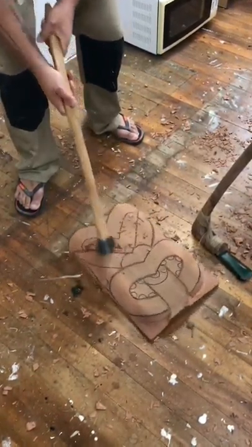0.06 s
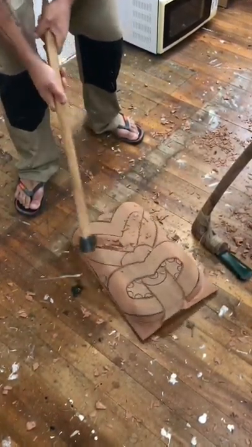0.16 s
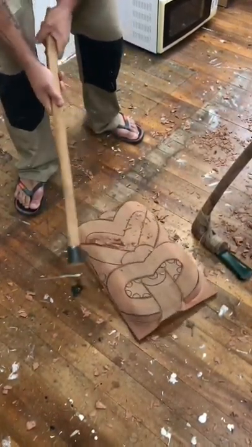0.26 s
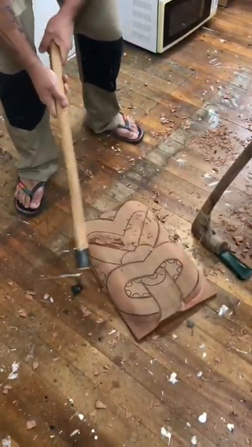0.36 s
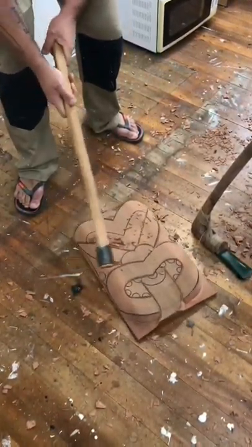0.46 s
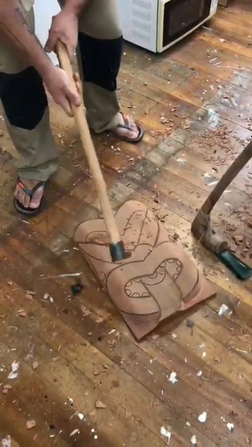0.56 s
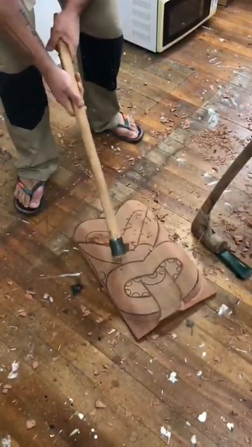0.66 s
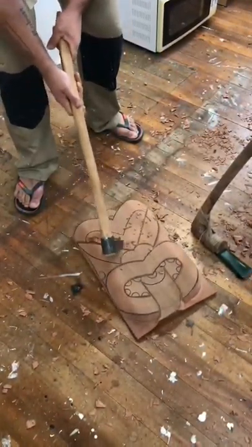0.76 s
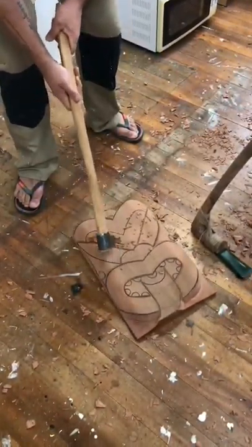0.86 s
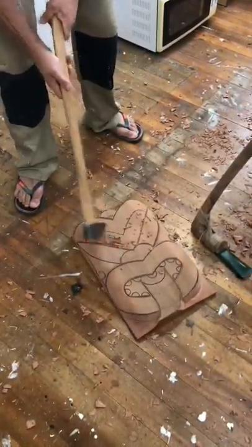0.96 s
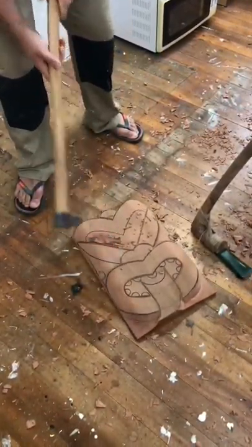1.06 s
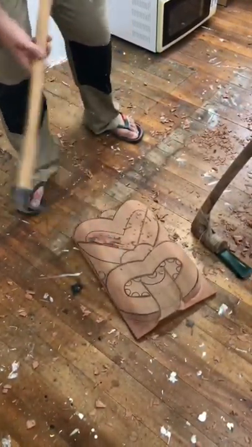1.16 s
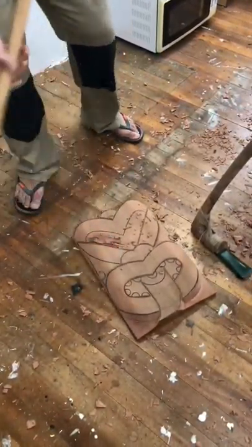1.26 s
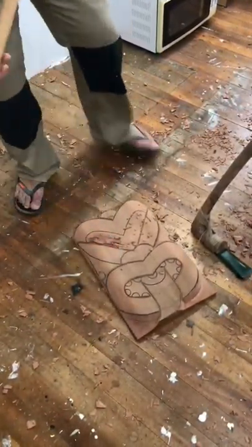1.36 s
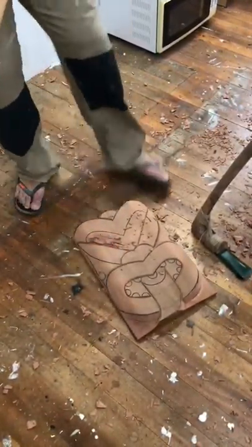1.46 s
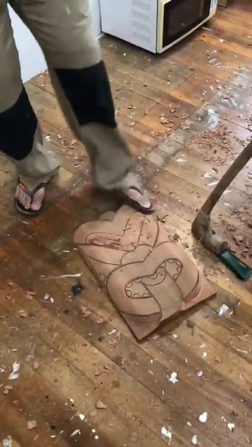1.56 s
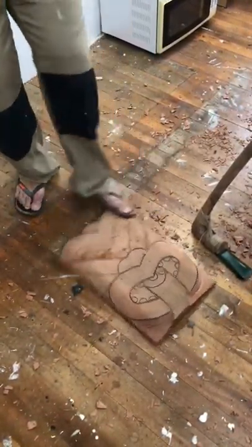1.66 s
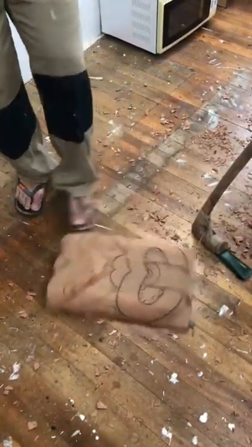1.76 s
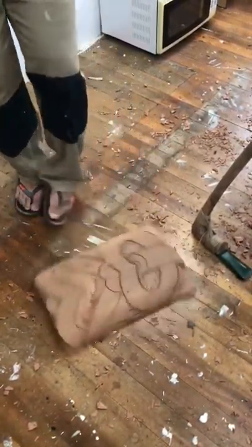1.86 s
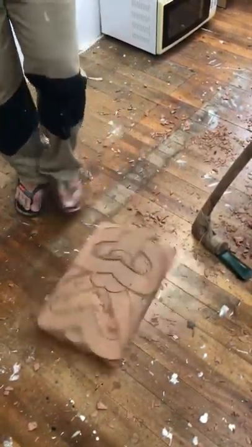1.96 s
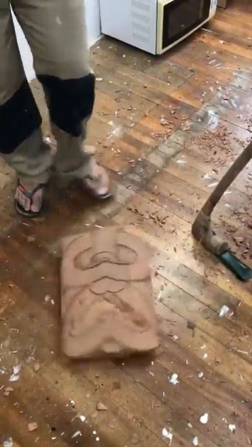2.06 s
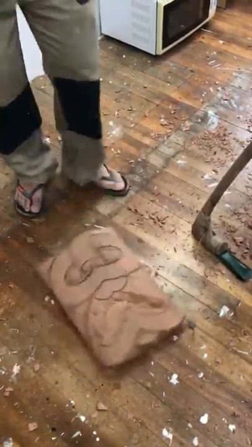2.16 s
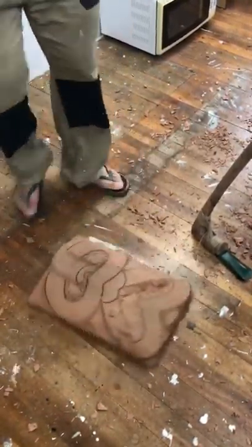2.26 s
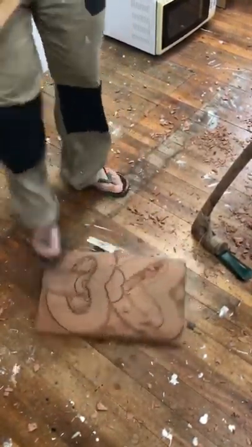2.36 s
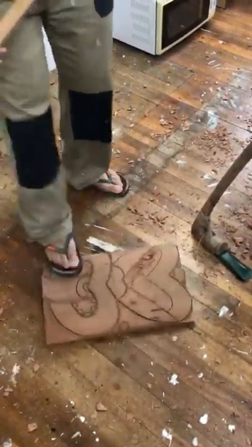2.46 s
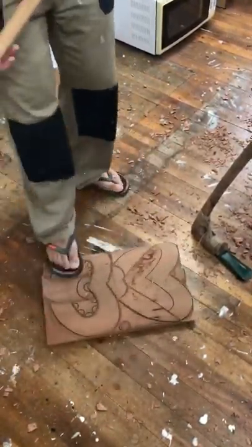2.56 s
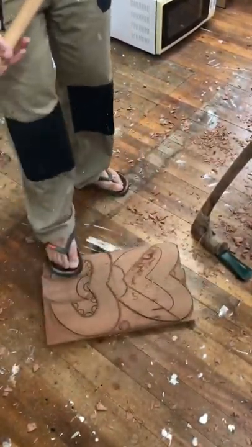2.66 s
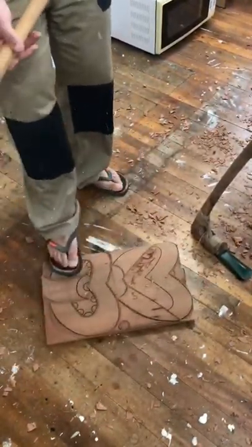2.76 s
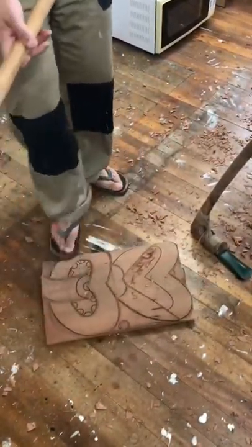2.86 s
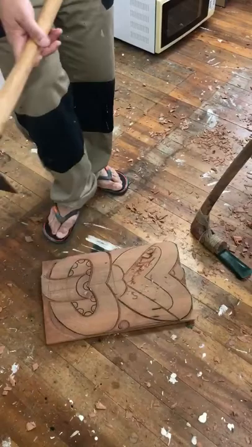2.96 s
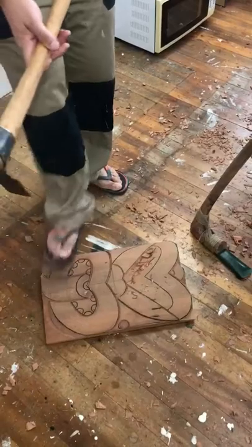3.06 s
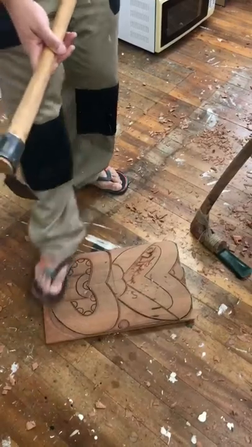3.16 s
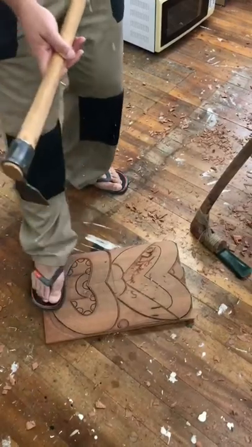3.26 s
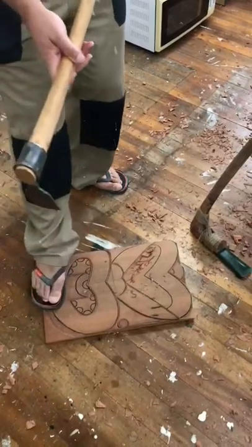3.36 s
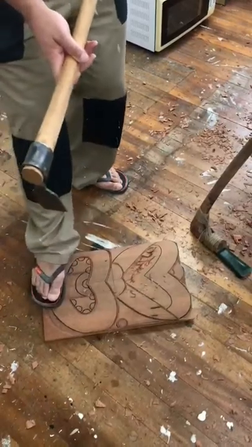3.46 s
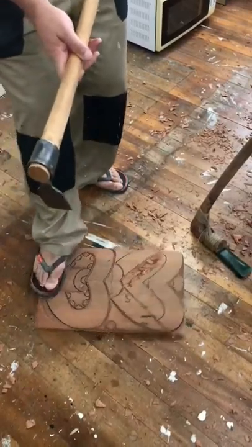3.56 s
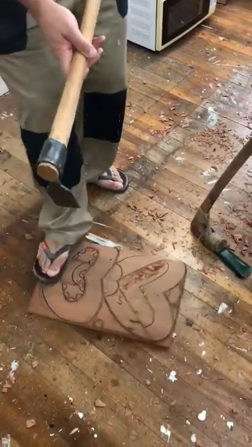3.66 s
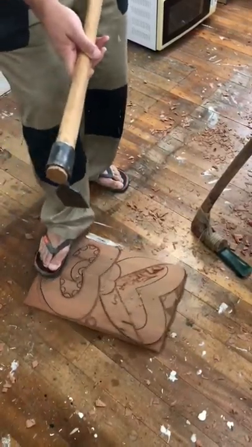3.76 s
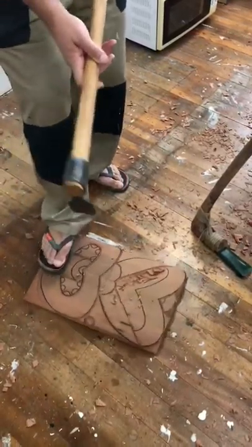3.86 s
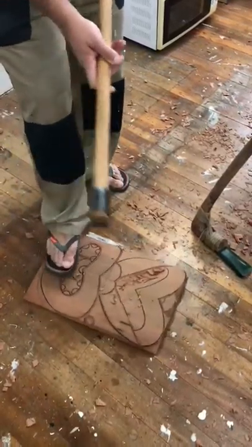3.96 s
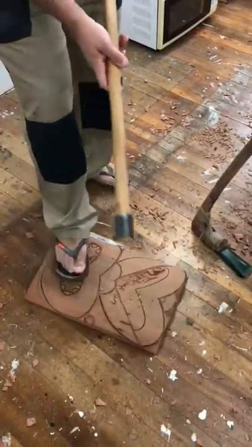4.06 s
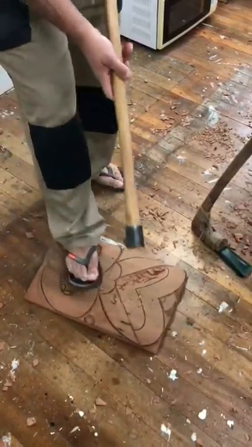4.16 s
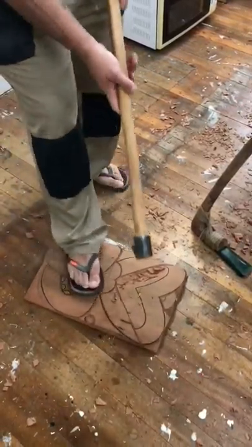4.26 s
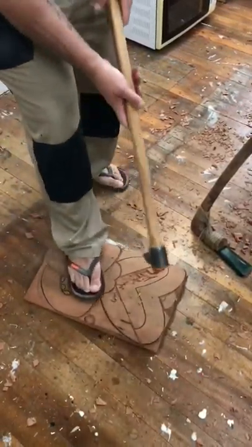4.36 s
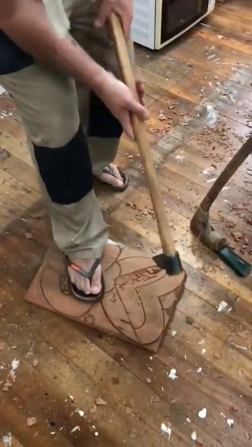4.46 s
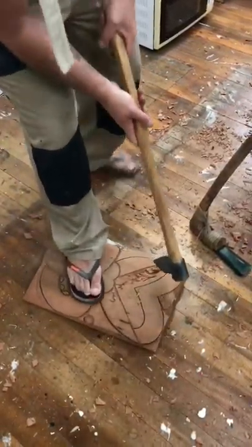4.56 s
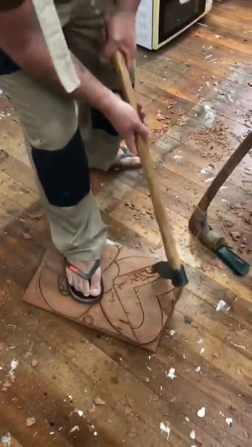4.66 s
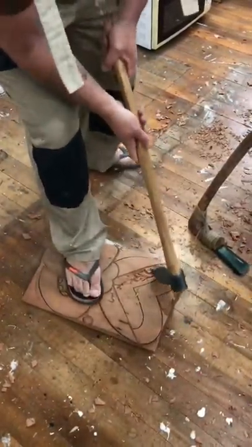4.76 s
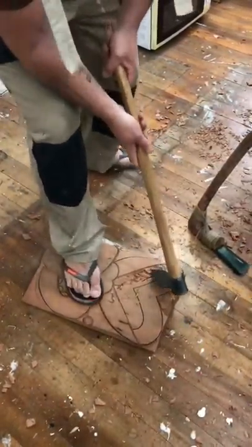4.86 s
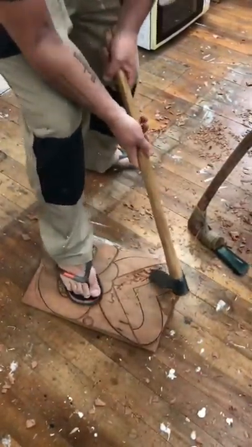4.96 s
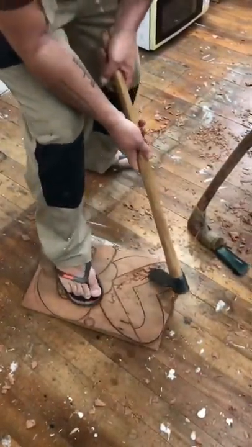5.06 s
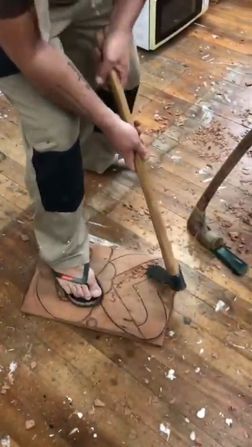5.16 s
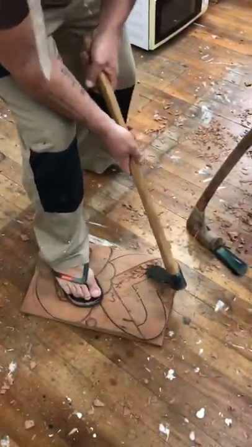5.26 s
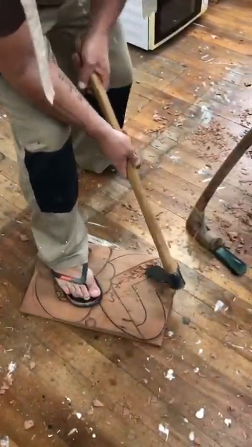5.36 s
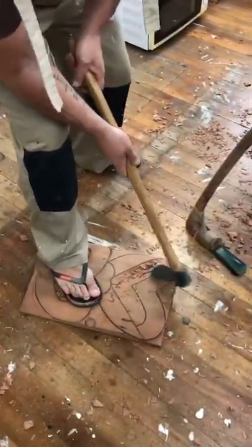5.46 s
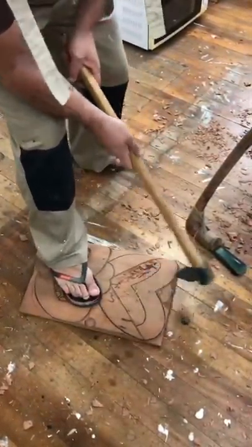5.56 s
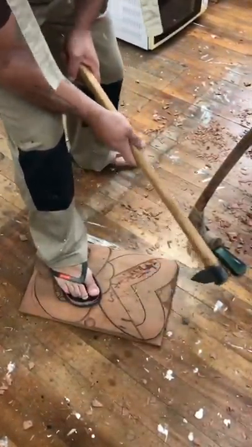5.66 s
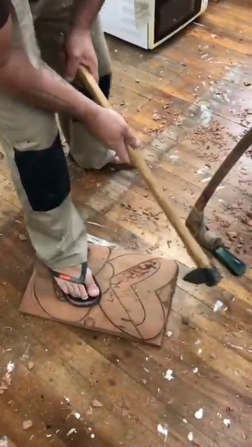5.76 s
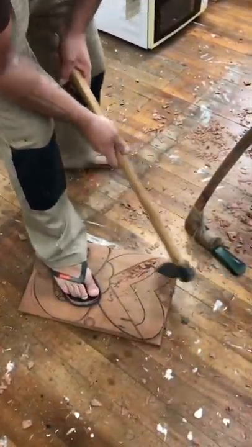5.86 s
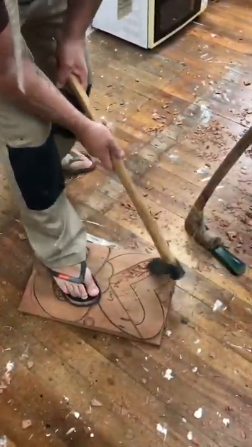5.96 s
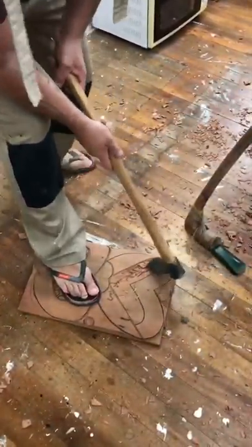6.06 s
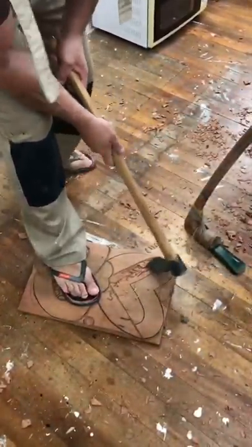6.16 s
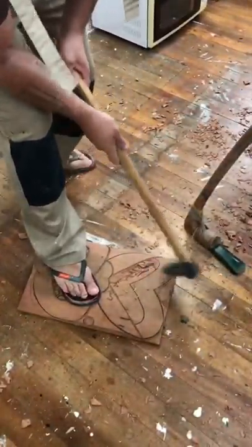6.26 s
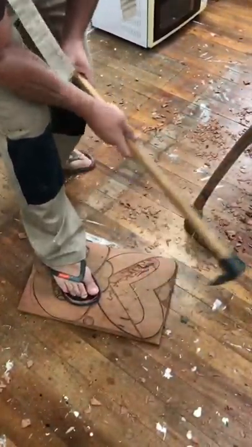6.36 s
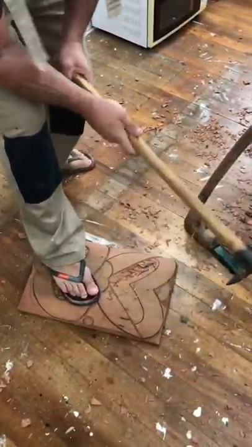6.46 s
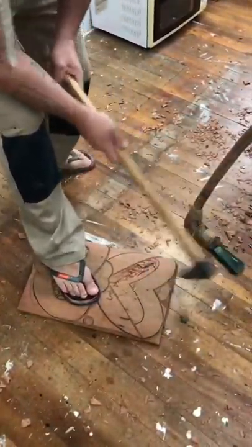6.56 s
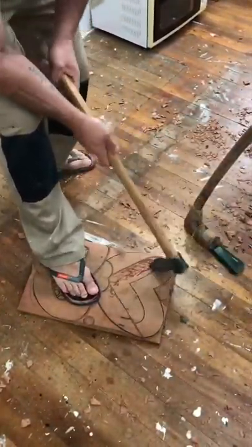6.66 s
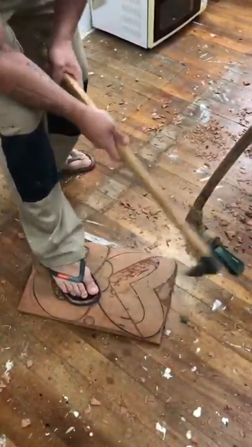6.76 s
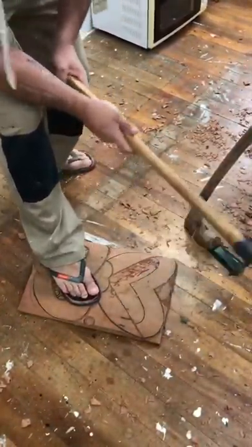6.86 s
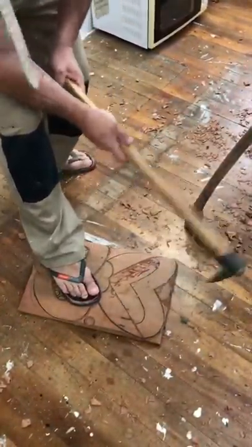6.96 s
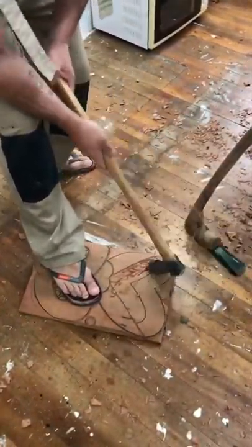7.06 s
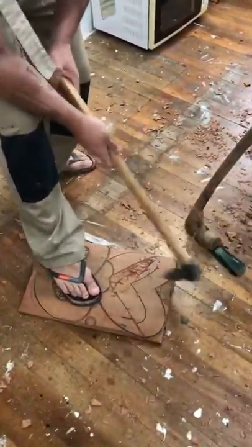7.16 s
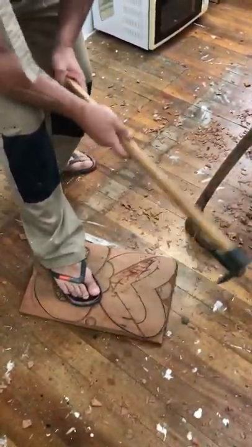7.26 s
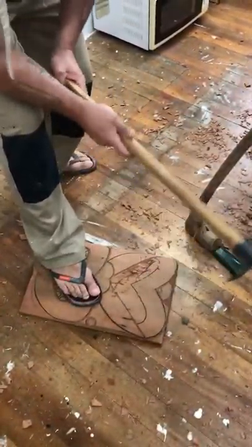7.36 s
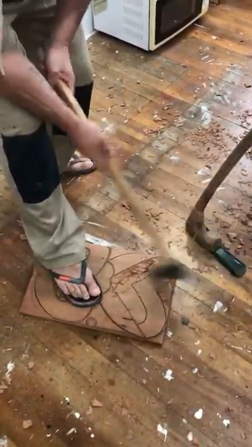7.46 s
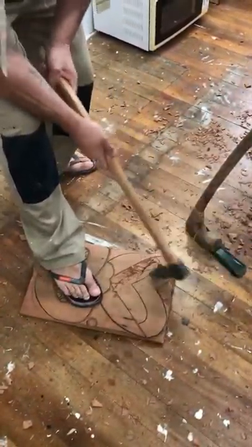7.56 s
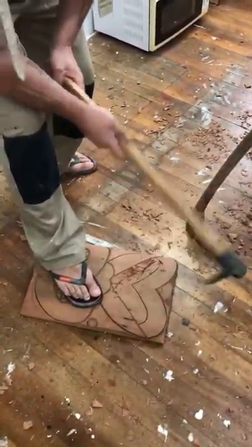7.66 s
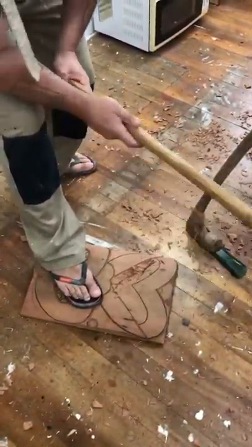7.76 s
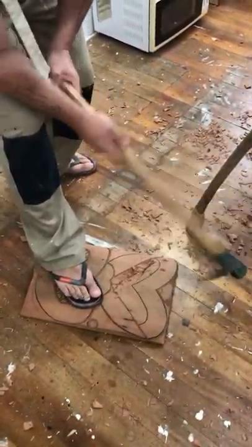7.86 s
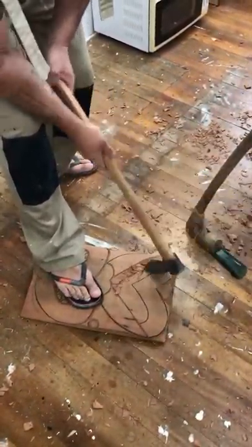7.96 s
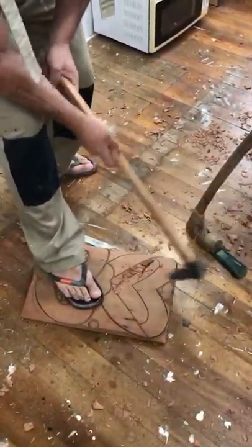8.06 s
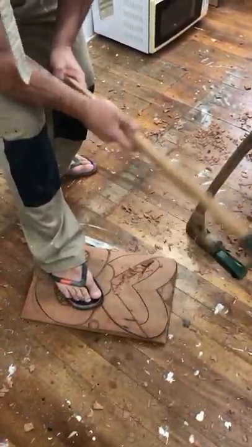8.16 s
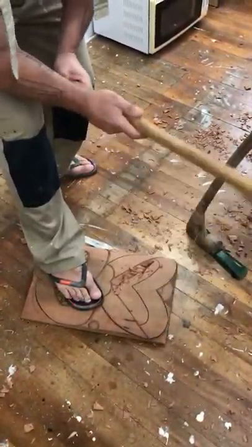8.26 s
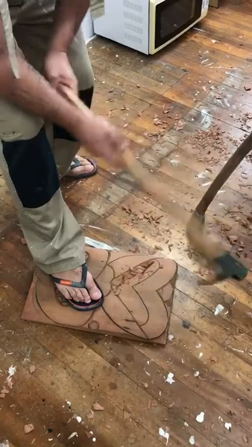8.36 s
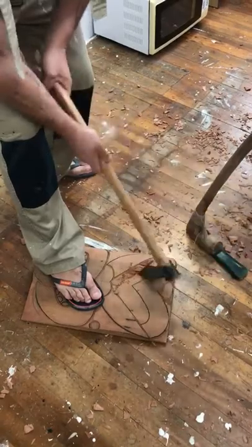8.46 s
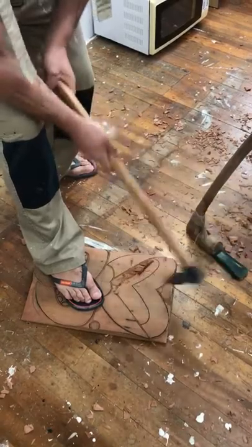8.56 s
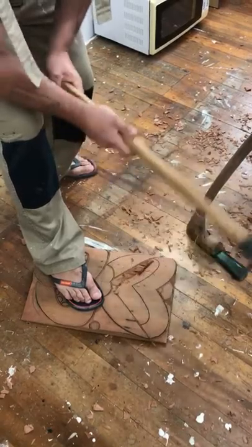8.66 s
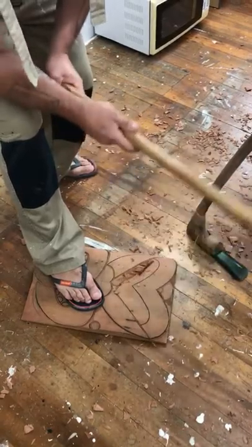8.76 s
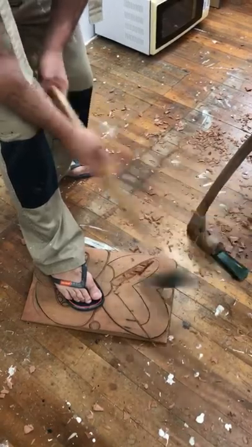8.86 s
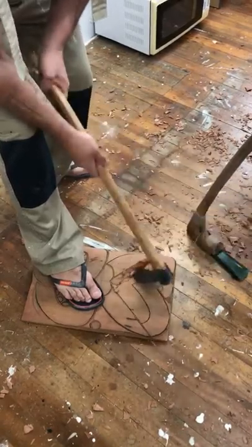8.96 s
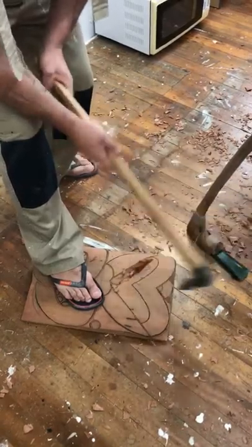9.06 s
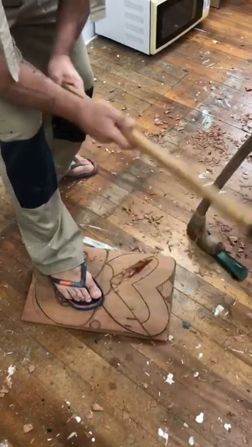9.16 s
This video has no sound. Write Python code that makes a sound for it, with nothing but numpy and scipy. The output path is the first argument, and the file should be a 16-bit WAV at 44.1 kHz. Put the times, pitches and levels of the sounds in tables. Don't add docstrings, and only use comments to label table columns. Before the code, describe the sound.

A wood panel scrapes round on hollow floorboards, a few soft thuds follow, then an adze cracks into it six times at an even pace.

```python
import sys
import numpy as np
from scipy import signal
from scipy.fft import rfft, irfft
from scipy.io import wavfile
from scipy.ndimage import uniform_filter1d, minimum_filter1d, map_coordinates

SR = 44100
rng = np.random.default_rng(int(sys.argv[2]) if len(sys.argv) > 2 else 0)


def wrap_up_sound(samples):
    columns = np.atleast_2d(samples).T
    tamed = np.clip(columns, -1, 1)
    steps = np.round(tamed * 32767).astype(np.int16)
    wavfile.write(sys.argv[1], SR, steps)


def elevation(decibels):
    levels = np.asarray(decibels, float)
    return 10 ** (levels / 20)


N = 406585

# [t/s, joist thump level/dB, floor boom level/dB, panel knock level/dB, cut length/ms]
CHOP_BLOWS = [
    (6.835, -8, -5.5, -16, 9),
    (7.274, -9, -4.5, -13, 11.5),
    (7.697, -8.5, -3, -9, 8.8),
    (8.139, -14, -4, -8.5, 6),
    (8.6385, -12.5, -2.5, -11.5, 5.6),
    (9.102, -6.5, -1.5, -11, 6.1),
]


def chops():
    *blow, cut_ms = np.transpose(CHOP_BLOWS)
    crack_db = -12.5 - 0.48 * cut_ms
    return blows(*blow, crack_db, cut_ms, shift_ms=1.623, fall_ms=0.98, contact_ms=0.0075, drive_db=3.0)


# [t/s, joist thump level/dB, floor boom level/dB, panel knock level/dB, crack level/dB]
KNOCK_BLOWS = [
    (0.938, -17.5, -32, -66, -34),
    (1.768, -22, -41, -45, -37),
    (2.664, -17.5, -10, -10, -41.5),
    (3.445, -16, -11, -12.5, -47),
    (4.434, -14.5, -11.5, -10.5, -44.5),
    (5.144, -25.5, -34.5, -45, -37),
    (6.143, -14, -24, -39.5, -29.5),
]


def knocks():
    blow = np.transpose(KNOCK_BLOWS)
    cut_ms = np.full(len(blow[0]), 0.28)
    return blows(*blow, cut_ms, shift_ms=0.11, fall_ms=2.8, contact_ms=0.058, drive_db=2.5)


# [t/s, joist thump level/dB, floor boom level/dB, panel knock level/dB, crack level/dB]
SANDAL_STEPS = [
    (3.135, -25, -55, -65, -70),
    (4.09, -26.5, -61, -64.5, -77),
    (5.353, -20, -22, -20, -62),
]


def steps():
    blow = np.transpose(SANDAL_STEPS)
    cut_ms = np.full(len(blow[0]), 0.28)
    return blows(*blow, cut_ms, shift_ms=0.2, fall_ms=3.8, contact_ms=0.38, drive_db=3.0)


# [f/Hz, level/dB per Hz]
CRACK_COLOUR = [(470, -3.5), (800, 0.5), (1420, 4), (1900, 0.5), (3020, 1), (5110, -3), (7730, -9),
                (14800, -13), (16000, -55)]
# [f/Hz, level/dB, t60/s]
BLADE_MODES = [(14440, 1, 0.021), (11500, -4, 0.011), (7000, -61, 0.0044)]
# [f/Hz, level/dB, t60/s]
PANEL_MODES = [(451, -7, 0.056), (554.5, -8, 0.22), (606, 1, 0.16), (701.4, 3, 0.078), (833, 2, 0.041),
               (914, 3.5, 0.019), (1114, -1.5, 0.066), (1320, 2, 0.042), (1523, -4.5, 0.03),
               (1734, -2, 0.02), (2257, -9, 0.044), (2950, -2.5, 0.0054)]
# [f/Hz, level/dB, t60/s]
BOARD_MODES = [(130.4, -3.5, 0.24), (163.8, -2, 0.2), (173.1, -3, 0.31), (233.7, 1, 0.096),
               (254.8, -6.5, 0.5), (265.6, -1, 0.12), (310, -2.5, 0.12), (354.9, 1.2, 0.1),
               (391.2, -10.5, 0.4), (413, -1, 0.067)]
# [f/Hz, level/dB, t60/s]
JOIST_MODES = [(45.4, -17, 0.71), (50.7, -17, 1), (62.9, 2, 0.26), (71.8, 5, 0.31), (77, -44, 0.035),
               (99.4, -2, 0.47), (129.7, -9.5, 0.52)]
# [f/Hz, level/dB per Hz]
FAR_KNOCK_COLOUR = [(250, -42.5), (420, -14.5), (650, 8.5), (1200, 2), (2000, -11.5), (3200, -23),
                    (5000, -33), (16000, -65.5)]
BOOM_LAG_MS, BOOM_RISE_MS, THUMP_LAG_MS = 4.085, 6, 9.8
THUMP_SEND_DB = -11


def blows(s, thump_db, boom_db, knock_db, crack_db, cut_ms, shift_ms, fall_ms, contact_ms, drive_db):
    s = s + shift_ms / 1000
    boards_s = s + BOOM_LAG_MS / 1000
    joists_s = s + THUMP_LAG_MS / 1000
    boom_db = boom_db + drive_db
    thump_db = thump_db + drive_db
    crack = coloured(CRACK_COLOUR) * burst(s, crack_db + 6.0, cut_ms, fall_ms)
    blade = strike(BLADE_MODES, s, crack_db - 8.5, contact_ms=0.0036)
    knock = strike(PANEL_MODES, s, knock_db - 4, contact_ms)
    boom = strike(BOARD_MODES, boards_s, boom_db - 8, contact_ms=0.25)
    thump = strike(JOIST_MODES, joists_s, thump_db - 8.5, contact_ms=0.85, together=True)
    swell = signal.windows.hann(int(BOOM_RISE_MS * SR / 4000) + 3)
    boom = np.convolve(boom, swell / swell.sum())[:N]
    direct = crack + blade + knock + thump + boom

    at = (s * SR).astype(int)
    click, thud = np.zeros((2, N))
    click[at] = elevation(crack_db + 22.0)
    thud[at] = elevation(knock_db + 19)
    far_crack = shape(click, CRACK_COLOUR)
    far_knock = soften(shape(thud, FAR_KNOCK_COLOUR), contact_ms)
    short_boards = [(hz, db, 0.21 * t60) for hz, db, t60 in BOARD_MODES]
    far_boom = strike(short_boards, boards_s, boom_db + 6.0, contact_ms=0.67)
    to_walls = far_crack + far_knock + far_boom + elevation(THUMP_SEND_DB) * thump
    return np.array([direct, to_walls])


# [t/s, body level/dB, f/Hz, bright level/dB]
SPLINTER_CLICKS = [
    (6.839, 7.5, 1190, -27),
    (9.104, 11, 2370, -37.5),
]


def splinters():
    return with_send(ticks(SPLINTER_CLICKS), send_db=-13)


# [t/s, body level/dB, f/Hz, bright level/dB]
CHIP_CLICKS = [(0.174, -23, 2900, -34), (0.171, -5, 12100, -54), (1.319, -26.5, 2390, -53),
               (1.406, -24, 1550, -64), (1.529, -36, 1010, -59.5), (1.661, -33, 3900, -73.5),
               (2.019, -21, 5040, -53), (3.4335, -6.5, 700, -43.5), (3.668, -17, 1900, -57),
               (4.593, -27, 2540, -50), (4.812, -21.5, 3050, -44.5), (4.889, -26, 1220, -54),
               (4.976, -56, 3000, -50), (5.033, -25, 1380, -43.5), (5.524, -34, 2440, -81),
               (5.751, -26.5, 2500, -67), (6.015, -26, 1030, -65), (6.043, -17, 2380, -66),
               (6.443, -30, 2610, -48), (6.513, -18, 1380, -45.5), (6.556, -27, 1180, -34),
               (6.654, -22, 1300, -37), (7.094, -43, 6020, -50.5), (7.106, -26, 6100, -46)]


def chips():
    return with_send(ticks(CHIP_CLICKS), send_db=0.5)


# [f/Hz, level/dB per Hz]
GRIT_COLOUR = [(1300, -11.5), (2500, 6), (3770, 3), (6400, 3.5), (10400, -3), (14400, -1.5), (16000, 5.5)]


def ticks(rows):
    s, body_db, pitch_hz, bright_db = np.transpose(rows)
    rise_ms = np.full(len(s), 1.3)
    out = coloured(GRIT_COLOUR) * burst(s, bright_db + 4.0, rise_ms, fall_ms=2.6)
    for at, level_db, hz in zip(s, body_db, pitch_hz):
        i = int(at * SR)
        push = np.zeros(2000)
        push[:400] = rng.standard_normal(400) * elevation(level_db - 25.0 - 0.04 * np.arange(400))
        out[i:i + 2000] += ring(push, hz, t60=6 / hz)
    return out


# [t/s, level/dB]
EDGE_TAPS = [
    (0.939, -20.5),
    (2.496, -33),
]
# [f/Hz, level/dB, t60/s]
EDGE_MODES = [(764, -11, 0.04), (1050, -14.5, .008), (2430, -22, .003), (3800, -5, 0.009),
              (6200, -0.5, .002), (13500, -2.5, .002)]


def taps():
    s, level_db = np.transpose(EDGE_TAPS)
    contact = rng.standard_normal(300) * elevation(-0.5 - 0.45 * np.arange(300))
    edge = strike(EDGE_MODES, s, level_db, contact_ms=0.0069)
    return with_send(np.convolve(edge, contact)[:N], send_db=-5)


# [t/s, speed as grit level/dB]
SPIN_SPEED = [
    (1.77, -49),
    (1.802, -54),
    (1.944, -44),
    (2.08, -47.5),
    (2.63, -53),
    (2.655, -43),
]


def spin_gains():
    t = np.arange(N) / SR
    s, speed_db = np.transpose(SPIN_SPEED)
    spinning = (t >= s[0]) * (t <= s[-1])
    over_grit_db = np.array([[0], [-1], [7]])
    return spinning * elevation(np.interp(t, s, speed_db) + over_grit_db)


# [t/s, length/s, grit hiss level/dB, wood
# rasp level/dB, floor rumble level/dB]
SCUFF_MOVES = [(-.04, .2, -57, -50, -35), (0.163, 0.068, -56, -56, -40), (0.193, 0.31, -62.5, -53, -43),
               (1.327, 0.15, -59, -63, -45), (1.418, .16, -55, -52.5, -54.5),
               (1.771, 0.069, -66.5, -48.5, -27), (1.817, 0.21, -53, -33, -30),
               (1.99, 0.065, -71, -46, -33.5), (2.072, 0.22, -76.5, -37.5, -58.5),
               (2.23, 0.13, -74.5, -52, -35), (2.405, 0.055, -71.5, -36, -26.5),
               (2.585, 0.075, -73.5, -45, -30), (2.957, 0.16, -45, -60, -66),
               (3.683, .31, -59, -43.5, -44.5), (4.125, 0.16, -64, -98, -52), (4.688, 0.12, -48, -56, -62),
               (4.805, 0.077, -54.5, -61, -45), (5.008, 0.12, -64, -58, -56),
               (5.114, 0.066, -45.5, -62, -44), (5.3, 0.091, -63, -46, -37.5),
               (5.981, 0.21, -45, -46.5, -61), (6.11, 0.048, -38.5, -42, -28),
               (6.378, 0.073, -60, -55, -46.5)]


def scuff_gains():
    t = np.arange(N) / SR
    attack, release = 0.35, 0.35
    gains = np.zeros((3, N))
    for start, length, *levels_db in SCUFF_MOVES:
        part = (t - start) / length
        swell = np.clip(np.minimum(part / attack, (1 - part) / release), 0, 1) ** 2
        gains += np.outer(elevation(np.array(levels_db)), swell)
    return gains


# [f/Hz, level/dB per Hz]
RASP_COLOUR = [(180, -25.5), (300, -10.5), (569, -11.5), (730, -20.5), (831, -23), (1230, 20.5),
               (1310, 17.5), (1440, 2), (3290, -10), (4000, -15.5), (5200, -55), (8800, -120)]
# [f/Hz, level/dB per Hz]
RUMBLE_COLOUR = [(15, -51), (25, -44.5), (52, -1), (70, 2.5), (130, 0.5), (172, -9), (321, -14),
                 (400, -22.5), (520, -39.5), (880, -120)]


def slides():
    hiss, rasp, rumble = uniform_filter1d(spin_gains() + scuff_gains(), size=300, axis=1)
    clumps = elevation(1.8 * drift(45) + 2.6 * drift(300) + 2.5)
    grit = hiss * coloured(GRIT_COLOUR)
    wood = rasp * patchy(RASP_COLOUR, low_hz=282, patch_db=4.0, count=8)
    edge_hz, _, edge_t60 = EDGE_MODES[0]
    wood = wood + elevation(-15) * ring(wood, edge_hz, edge_t60)
    floor = rumble * elevation(5.2 * drift(24) - 6.5) * coloured(RUMBLE_COLOUR)
    return clumps * (grit + wood) + floor


# [f/Hz, t60/s, level/dB]
ROOM_DECAY = [(40.2, 2.2, -2), (71, 2.4, -17), (120, 0.39, -6), (270, 1.48, -4), (400, 0.61, -4.5),
              (726, 0.98, -4.5), (1900, 0.72, -3.5), (4600, 0.46, -8), (13000, 0.36, -8)]


def room(x):
    early_db, early_share = 7.5, 0.21
    t = np.arange(int(1.2 * SR)) / SR
    tail = 0
    white = rng.standard_normal((2, len(t)))
    edges = 25 * 2 ** np.arange(0, 9.6, .5)
    for k, (low, high) in enumerate(zip(edges, edges[1:])):
        band = bandpass(white[k % 2], low, high)
        middle_hz = np.sqrt(low * high)
        t60 = at_hz(ROOM_DECAY, middle_hz)
        level = elevation(at_hz(ROOM_DECAY, middle_hz, axis=2)) * np.sqrt(2 * np.log(1000) / (t60 * SR))
        late = elevation(-60 * t / t60)
        early = elevation(early_db - 60 * t / (early_share * t60))
        tail = tail + level * band * (late + early)
    build = np.clip((t - .003) / 0.0015, 0, 1)
    return signal.fftconvolve(x, tail * build)[:N]


# [f/Hz, level/dB per Hz]
AIR_COLOUR = [(13, -27), (22, -36), (53, 8), (70, -3), (263, -9.5), (294, -15), (337, -23.5), (1040, -22.5),
              (1810, -23.5), (2020, -23.5), (2450, -25.5), (3320, -29), (5930, -32), (16000, -47)]
# [f/Hz, level/dB rms]
HUM_TONES = [(307, -70.5), (97, -68)]


def air():
    t = np.arange(N) / SR
    hum = 0
    for hz, level_db in HUM_TONES:
        hum = hum + elevation(level_db + 10.5 + 1.5 * drift(0.8)) * np.sin(2 * np.pi * hz * t)
    return elevation(-50.5 + 0.8 * drift(4.16)) * coloured(AIR_COLOUR) + hum


def strike(modes, times, levels_db, contact_ms, together=False):
    at = np.minimum((np.asarray(times) * SR).astype(int), N - 1)
    out = np.zeros(N)
    spread_db = 2.5 * rng.standard_normal((len(at), len(modes)))
    for k, (hz, mode_db, t60) in enumerate(modes):
        sign = 1 if together else (-1) ** k
        push = np.zeros(N)
        push[at] = sign * elevation(levels_db + mode_db + spread_db[:, k])
        out += ring(push, hz, t60)
    return soften(out, contact_ms)


def ring(push, hz, t60):
    r = elevation(-60 / (t60 * SR))
    w = 2 * np.pi * hz / SR
    return signal.lfilter([0, np.sin(w)], [1, -2 * r * np.cos(w), r * r], push + 1e-18)


def soften(x, contact_ms):
    r = np.exp(-1000 / (contact_ms * SR))
    return signal.lfilter([1 - r], [1, -r], x)


def burst(times, levels_db, rise_ms, fall_ms):
    out = np.zeros(N)
    for s, level_db, rise in zip(times, levels_db, rise_ms):
        i = np.arange(max(int((s - .03) * SR), 0), min(int((s + .05) * SR), N))
        ms = (i / SR - s) * 1000
        swell = np.clip(1 + ms / max(rise, .3), 0, 1) ** 2
        out[i] += elevation(level_db) * swell * np.exp(-np.maximum(ms, 0) / fall_ms)
    return out


def with_send(x, send_db):
    return x * elevation([[0], [send_db]])


def coloured(spectrum):
    return shape(rng.standard_normal(N), spectrum)


def shape(x, spectrum):
    gain = elevation(at_hz(spectrum, np.maximum(np.fft.rfftfreq(N, 1 / SR), 1)))
    return irfft(rfft(x) * rms_one(gain), N)


def patchy(spectrum, low_hz, patch_db, count):
    noise = coloured(spectrum)
    edges = low_hz * 2 ** (np.arange(count + 1) / 2)
    out = np.zeros(N)
    for k, (low, high) in enumerate(zip(edges, edges[1:])):
        out += bandpass(noise, low, high) * elevation(patch_db * drift(25)) * (-1) ** k
    return rms_one(out)


def bandpass(x, low, high):
    return signal.sosfilt(signal.butter(2, [low, high], "band", fs=SR, output="sos"), x)


def drift(rate):
    values = rng.standard_normal(int(N / SR * rate) + 3)
    return map_coordinates(values, [np.arange(N) * rate / SR], order=3)


def rms_one(x):
    return x / np.sqrt(np.mean(x ** 2) + 1e-20)


def at_hz(points, hz, axis=1):
    points = np.array(points)
    return np.interp(np.log(hz), np.log(points[:, 0]), points[:, axis])


def scene():
    struck = chops() + knocks() + steps()
    small = chips() + splinters() + taps()
    direct, to_walls = struck + small + slides()
    return (direct + room(to_walls) + air())[None]


def band_limit(x):
    return signal.sosfilt(signal.butter(12, 16520, fs=SR, output="sos"), x)


def record(dry):
    low_hz, ceiling_db, release_db_s = 42, -0.2, 400
    dry = signal.sosfilt(signal.butter(3, low_hz, "high", fs=SR, output="sos"), dry)
    release_db = release_db_s * np.arange(N) / SR
    over_db = np.maximum(20 * np.log10(np.abs(dry[0]) + 1e-9) - ceiling_db, 0)
    held_db = np.maximum.accumulate(over_db + release_db) - release_db
    gain_db = uniform_filter1d(minimum_filter1d(-held_db, size=65), size=65)
    mix = dry * elevation(gain_db)
    return band_limit(mix)


dry = scene()
out = record(dry)
wrap_up_sound(out)
```